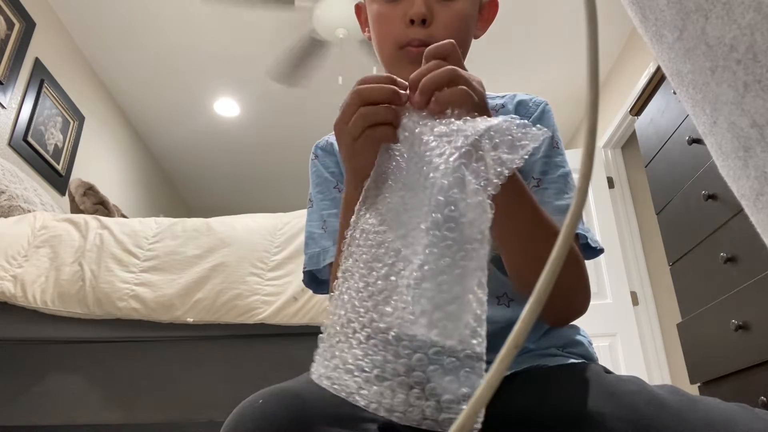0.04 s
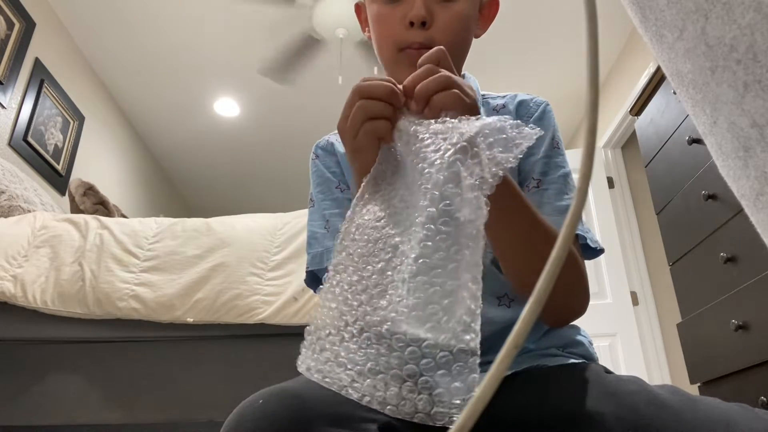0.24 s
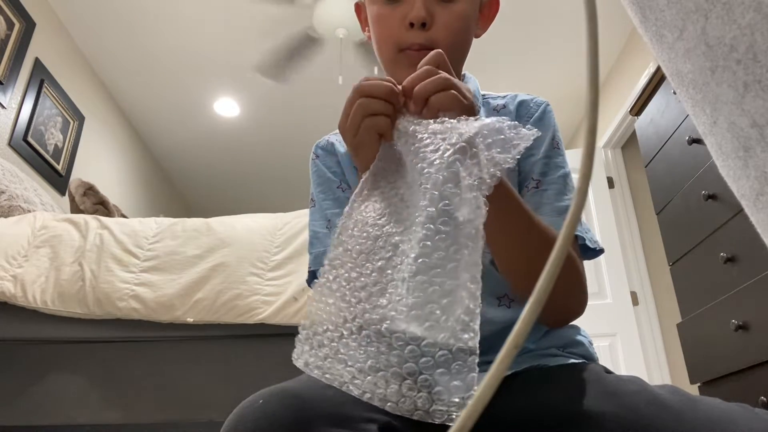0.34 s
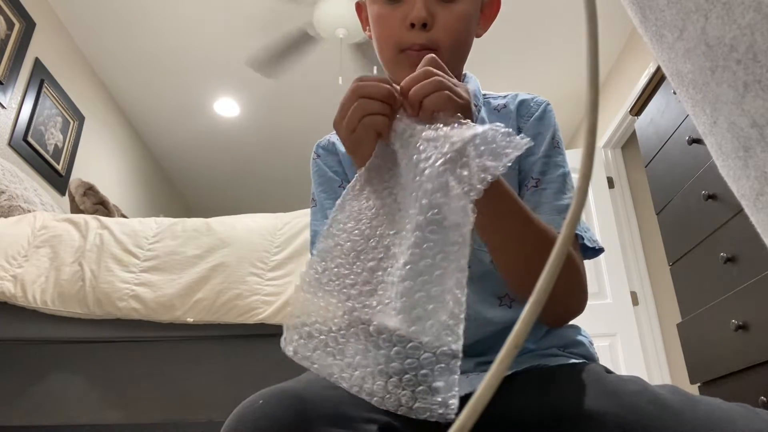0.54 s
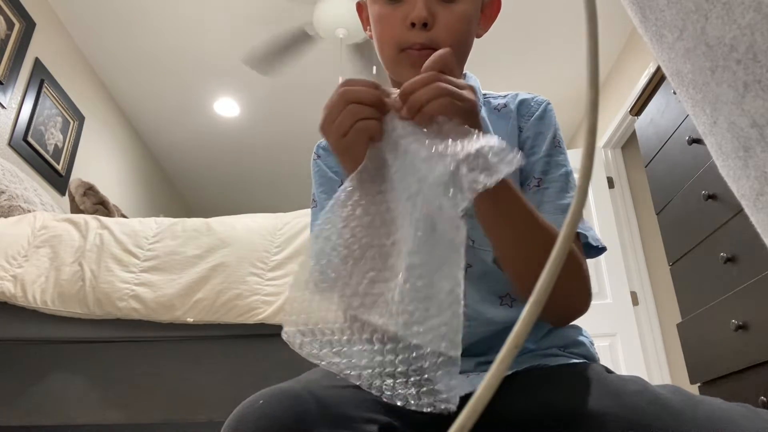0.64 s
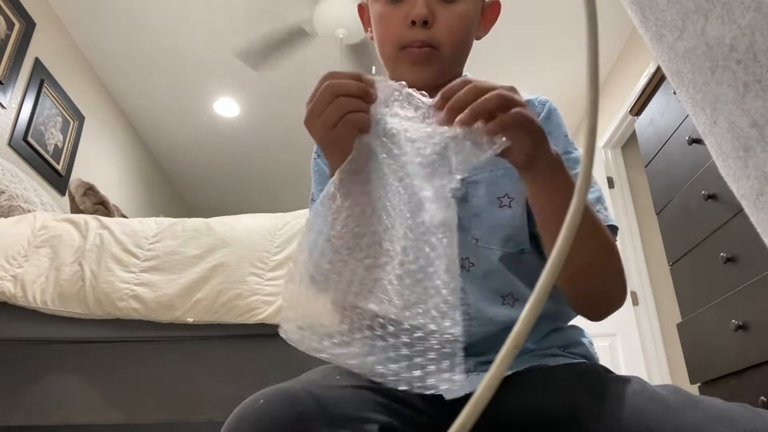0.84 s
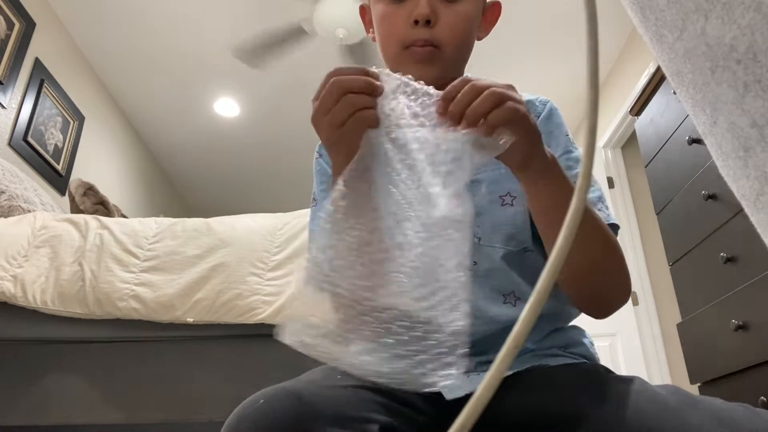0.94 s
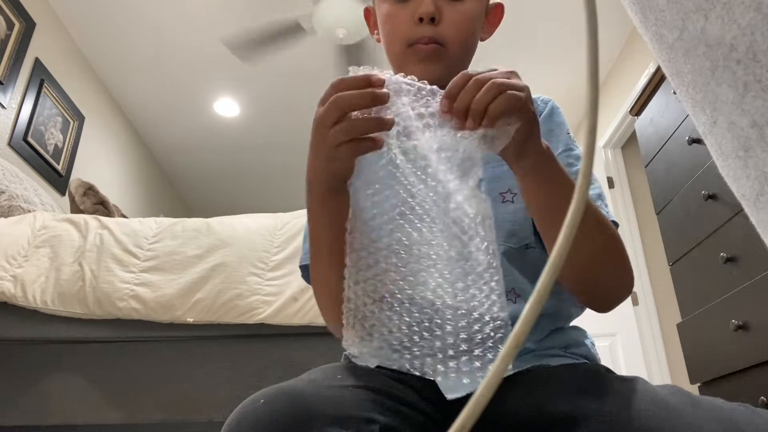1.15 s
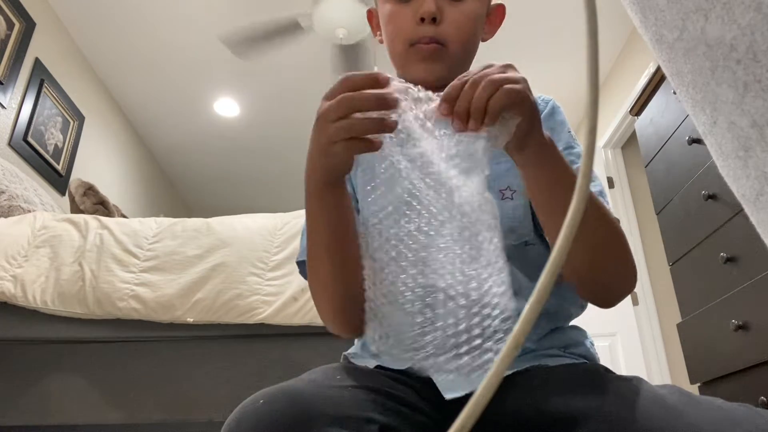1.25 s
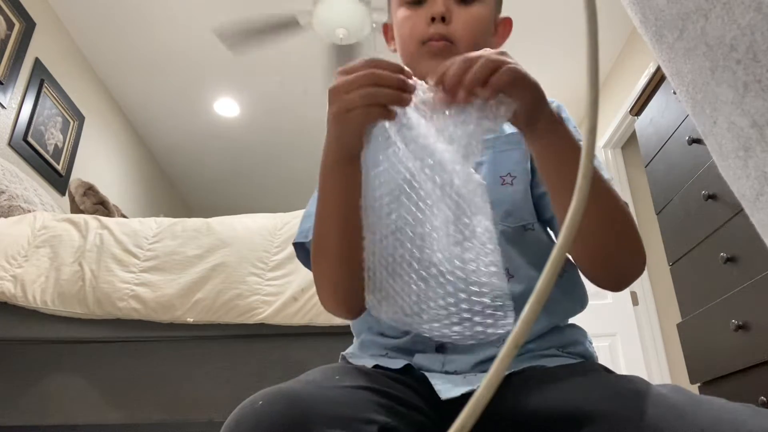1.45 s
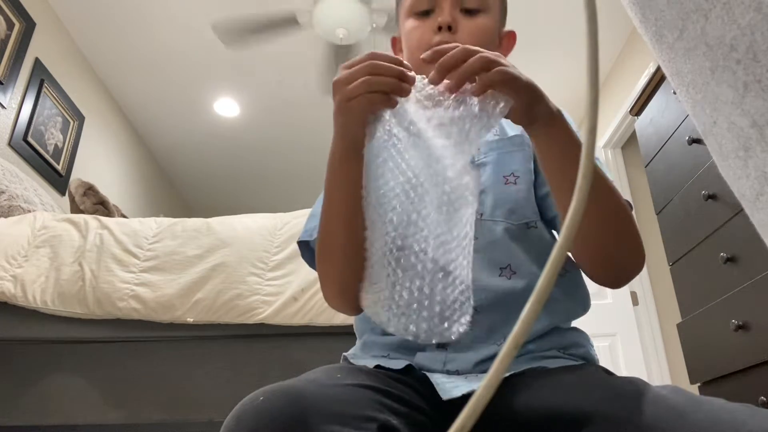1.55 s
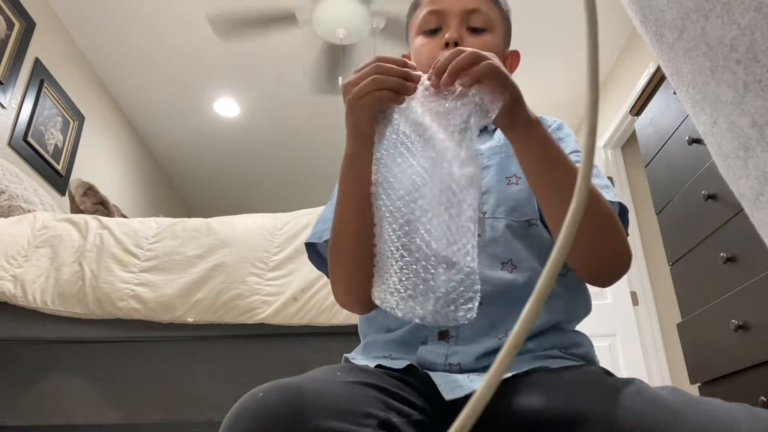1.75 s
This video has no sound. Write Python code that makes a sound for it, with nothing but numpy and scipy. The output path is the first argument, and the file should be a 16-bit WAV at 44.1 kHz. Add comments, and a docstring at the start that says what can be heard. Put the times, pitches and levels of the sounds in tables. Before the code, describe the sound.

Three sharp, close bubble wrap pops, followed by soft plastic crinkling in a quiet room.

```python
"""A small, quiet bedroom, with a sheet of bubble wrap held close to a stereo microphone pair.
Fingers burst three cells: each pop is a puff of air with a crack of tearing film, thrown back by the
ceiling and walls. Then the hands shift their grip: the film crinkles and ticks, and the hanging sheet
flaps softly. Underneath lie the low rumble of the moving body and the steady room tone."""
import sys
import numpy as np
from scipy import signal
from scipy.fft import rfft, irfft
from scipy.io import wavfile
from scipy.ndimage import uniform_filter1d

SR = 44100
rng = np.random.default_rng(int(sys.argv[2]) if len(sys.argv) > 2 else 0)


def inscribe(sig):
    """Save sig as 16-bit PCM at rate SR to the path in sys.argv[1].

    A 1-D sig is mono; a 2-D sig holds one channel per row.
    Samples are clipped to [-1, 1] before scaling.
    """
    pcm = np.round(np.clip(np.atleast_2d(sig).T, -1, 1) * 32767)
    wavfile.write(sys.argv[1], SR, pcm.astype(np.int16))


N = 79380

# cells bursting close to the microphones: (time [s], thump [dB], bass [dB], body [dB], ring [dB],
# treble [dB], crack [dB], crack tilt [dB/octave], recoil share [0-1], room send [dB])
BURSTING_CELLS = [(0.2323, -17, -16.5, -8.5, -7.5, -14.5, -1, 1.5, 0.62, -3.5),
                  (0.3322, 16, 3.5, -2.5, 0, -1.5, 8, -.5, 0, -10.5),
                  (0.5533, 0.5, -9.5, -3.5, 4.5, -24, -10.5, -3.5, 0.15, -13)]
# spectra of the close puff, the tearing film and the burst sent into the room: (frequency [Hz], level [dB])
PUFF_SPECTRUM = [(25, -53), (55, -5.5), (100, -0.5), (200, 12.5), (350, 19), (550, 20.5), (720, 24),
                 (950, 25), (1300, 7.5), (1650, 8), (2020, 19.5), (2380, 12), (2620, 6), (3300, 7),
                 (4500, 14), (6500, 12), (9500, -19), (12500, 6), (16000, -6)]
TEAR_SPECTRUM = [(300, -21.5), (1500, -2), (2800, -1.5), (5200, 7.5), (7500, 4.5), (9500, -5), (12500, -1),
                 (16000, -11)]
RADIATED_SPECTRUM = [(60, -9), (150, -9), (350, 16.5), (600, 12), (950, 15.5), (1300, 10), (1650, 13.5),
                     (2100, 13.5), (2600, 5), (3400, 12), (4600, 10.5), (7500, 13), (9500, 4), (12500, 6.5),
                     (16000, -24)]
def pops():
    """Each cell puffs, recoils, cracks and quivers; returns the direct sound and what reaches the room."""
    bands_hz = (70, 250, 900, 2200, 7000)  # thump, bass, body, ring, treble
    recoil_s, flutter_s, room_tone_share = 0.001614, 0.00274, 0.7
    direct, to_room = np.zeros((2, 2, N))
    for s, *bands_db, crack_db, tilt, recoil, room_db in BURSTING_CELLS:
        tone_db = read(list(zip(bands_hz, bands_db)), bins())
        puff = air_puff(read(PUFF_SPECTRUM, bins()) + tone_db)
        tear_db = crack_db + read(TEAR_SPECTRUM, bins()) + tilt_db(tilt)
        crack = colour(snap(decay_s=0.0016, rise_s=0.000074), tear_db)
        flutter_db = tear_db - 9.5 + tilt_db(-1.5)  # the torn film quivers on, softer and duller
        flutter = colour(snap(decay_s=flutter_s, rise_s=flutter_s), flutter_db)
        add(direct, s, puff + crack + flutter)
        add(direct, s + recoil_s, -recoil * puff)  # the cell wall springs back
        add(to_room, s, air_puff(read(RADIATED_SPECTRUM, bins()) + room_tone_share * tone_db + room_db))
    return direct, to_room


# single creases in the hands: (time [s], level [dB], tilt [dB/octave], decay [s])
CREASE_SNAPS = [(.056, -23, 2.5, 0.001), (0.086, -24.5, -2, 0.0012), (.183, -18.5, -1.5, 0.0043),
                (0.4745, -26, 12, 0.0006), (0.5369, -16, -2, 0.0023), (.6132, -17, 12, .0012),
                (0.6208, -7, 15, 0.0011), (0.6251, -5.5, 14.5, 0.0033), (0.6599, -7.5, 6.5, 0.004),
                (0.677, -7.5, -2, 0.0048), (0.682, -9, -2.5, 0.0019), (0.692, -11.5, -2, 0.0028),
                (.708, -17.5, -3.5, 0.00091), (0.756, -14, -2, 0.0016), (0.8215, -14.5, 6.5, 0.0012),
                (.847, -16, -4, .0012), (.9224, -8, 3, 0.0018), (0.9759, -14, -4, 0.0022),
                (.9985, -14, -3.5, .002), (1.0682, -10, 7.5, 0.001), (1.132, -21.5, -5.5, 0.0031),
                (1.148, -18.5, 12, 0.00074), (1.171, -16.5, 0, 0.00099), (1.2095, -11.5, 1, 0.0015),
                (1.223, -13, -1, 0.0021), (1.4134, -9, 1, 0.0032), (1.457, -15, -2, .003),
                (1.479, -20, 11, 0.0011), (1.582, -20.5, -2, 0.0027), (1.641, -19.5, 5, 0.0019)]
# bright, thin colour of the ticks and crinkling: (frequency [Hz], level [dB])
CRINKLE_COLOUR = [(300, -36), (1300, -10.5), (2100, 1), (2600, -8), (3300, -10), (4600, -5), (6000, -4.5),
                  (8100, -6), (9300, -20.5), (11500, -10.5), (13200, -15.5), (14400, -21.5), (16500, -47)]
def ticks():
    """Single creases snap over in the film."""
    out = np.zeros((2, N))
    for s, db, tilt, decay_s in CREASE_SNAPS:
        add(out, s, colour(snap(decay_s), db + read(CRINKLE_COLOUR, bins()) + tilt_db(tilt)))
    return out


# flaps of the hanging sheet: (time [s], level [dB], pitch [Hz])
SHEET_FLAPS = [(.182, -13.5, 680), (0.7565, -4, 780), (0.9223, 7.5, 708), (1.0123, 1, 627), (1.068, 0, 643),
               (1.173, -8, 593), (1.386, -4.5, 630), (1.4249, 3, 630), (1.459, -5.5, 370), (1.584, -8, 394),
               (1.692, -12.5, 690)]
# spectrum of one flap: (frequency [multiple of its pitch], level [dB])
FLAP_SPECTRUM = [(.08, -25), (.3, -6.5), (.7, -4), (1.3, 2), (1.9, -21), (3.2, -21), (6, -62)]
def buckles():
    """The sheet flips through and pushes a soft puff of air."""
    out = np.zeros((2, N))
    for s, db, hz in SHEET_FLAPS:
        add(out, s, air_puff(db + read(FLAP_SPECTRUM, bins() / hz)))
    return out


# crinkling of the film as the grip shifts: (time [s], level [dB])
CRINKLE_LEVEL = [(0, -71), (.07, -65.5), (.2, -62), (.45, -63), (.52, -55), (.6, -50.5), (.65, -52),
                 (.683, -40.5), (.71, -52.5), (.76, -60.5), (.817, -63), (.826, -51.5), (.89, -48.5),
                 (.94, -55), (1.01, -46.5), (1.06, -48.5), (1.09, -59), (1.125, -60.5), (1.14, -51),
                 (1.19, -58.5), (1.3, -49.5), (1.405, -54), (1.42, -45), (1.46, -50.5), (1.49, -59.5),
                 (1.655, -61.5), (1.683, -50.5), (1.703, -49), (1.725, -65), (1.765, -51.5), (1.8, -62)]
def crinkle():
    """Countless small creases and a few larger ones give way in the film."""
    creases = unit(grains(per_s=5000, spread_db=4.5)) + amp(-7.5) * crackles()
    return shaped(creases, CRINKLE_COLOUR) * level(CRINKLE_LEVEL)


def crackles(pitches=10, low_hz=1820, high_hz=12170, decay_cycles=2.6):
    """Larger creases, each ringing for a few cycles at its own pitch."""
    out, t = np.zeros((2, N)), np.arange(512) / SR
    clicks = grains(per_s=250, spread_db=2.5)
    pitch_index = rng.integers(pitches, size=N // 128 + 1).repeat(128)[:N]
    for k, hz in enumerate(np.geomspace(low_hz, high_hz, pitches)):
        ring = unit(np.exp(-t * hz / decay_cycles) * np.sin(2 * np.pi * hz * t)) * np.sqrt(hz)
        out += signal.oaconvolve(clicks * (pitch_index == k), ring[None], axes=1)[:, :N]
    return unit(out)


# spectrum of the whole sheet: (frequency [Hz], level [dB])
SHEET_SPECTRUM = [(60, -6), (200, -3), (380, 4.5), (600, 2.5), (950, 3.5), (1300, -11.5), (2200, -9.5),
                  (4000, -24), (16000, -25)]
# rustling of the sheet: (time [s], level [dB])
RUSTLE_LEVEL = [(0, -68.5), (.5, -58), (.64, -52.5), (.69, -43), (.73, -54.5), (.81, -54.5), (.875, -48),
                (.9, -43.5), (.95, -48), (1.02, -42), (1.1, -57), (1.17, -53), (1.39, -51.5),
                (1.425, -43.5), (1.48, -51), (1.54, -63), (1.585, -55.5), (1.64, -77), (1.695, -52),
                (1.73, -72), (1.77, -52), (1.8, -68)]
def rustle():
    """The moving sheet rustles, duller than its creases."""
    return shaped(grains(per_s=1500, spread_db=3), SHEET_SPECTRUM) * level(RUSTLE_LEVEL)


# spectrum of the hand on the sheet: (frequency [Hz], level [dB])
RUB_SPECTRUM = [(200, -24.5), (450, -13.5), (600, -0.5), (820, -3.5), (980, -5), (1250, -21), (4000, -42)]
# slide of the hand: (time [s], level [dB])
RUB_LEVEL = [(.66, -63), (.7, -43.5), (.73, -52.5), (.755, -40.5), (.79, -50), (.815, -56.5)]
def rub():
    """A hand slides over the sheet with a hollow rub."""
    return shaped(grains(per_s=1500, spread_db=3), RUB_SPECTRUM) * level(RUB_LEVEL)


# nearest walls and ceiling: (delay [s], level [dB], dull above [Hz])
WALL_ECHOES = [(0.0114, -13, 13900), (0.0151, -5, 5000), (.0175, -8, 5500)]
# reverberation of the bedroom: (frequency [Hz], time to fall 60 dB [s])
BEDROOM_DECAY = [(150, 0.092), (600, 0.24), (2000, 0.26), (6000, 0.24), (13000, 0.23)]
def bedroom(x, gap_s=0.0012, build_s=0.012):
    """Walls and ceiling return a few early echoes and a short diffuse tail."""
    hz, t, spectra = signal.stft(noise(SR // 2), SR, nperseg=256)
    decay = amp(-60 * t / read(BEDROOM_DECAY, hz)[:, None])
    tail = signal.istft(spectra * decay, SR, nperseg=256)[1]
    tail *= np.clip((np.arange(tail.shape[1]) / SR - gap_s) / build_s, 0, 1)
    tail /= np.linalg.norm(tail, axis=1, keepdims=True)
    for delay_s, db, dull_hz in WALL_ECHOES:
        treble_loss_db = 10 * np.log10(1 + (bins() / dull_hz) ** 4)
        add(tail, delay_s, colour(snap(decay_s=0.0005), db - treble_loss_db))
    return signal.fftconvolve(x, tail, axes=1)[:, :N]


# spectrum of the moving body: (frequency [Hz], level [dB])
RUMBLE_SPECTRUM = [(20, -23), (40, -8), (65, 0.5), (140, -1.5), (250, -8.5), (600, -35), (2000, -82)]
# its rumble and a brief low hum, before panning: (time [s], level [dB])
RUMBLE_LEVEL = [(0, -60), (.5, -63.5), (.95, -58), (1.08, -56.5), (1.2, -58), (1.45, -58), (1.53, -62),
                (1.8, -60)]
HUM_LEVEL = [(1.24, -80), (1.29, -59.5), (1.44, -55), (1.5, -73.5)]
def body_rumble(hum_hz=90.5, wobble_depth=0.022, left_over_right_db=16.5):
    """The moving body rumbles and a wavering hum swells briefly, both stronger on the left microphone."""
    rumble = shaped(noise(N), RUMBLE_SPECTRUM) * level(RUMBLE_LEVEL)
    wobble = unit(uniform_filter1d(rng.standard_normal(N), size=1500))
    pitch_hz = hum_hz * (1 + wobble_depth * wobble)
    hum = np.sqrt(2) * np.sin(2 * np.pi * np.cumsum(pitch_hz) / SR) * level(HUM_LEVEL)
    return (rumble + hum) * amp([[left_over_right_db / 2], [-left_over_right_db / 2]])


# background of the bedroom: (frequency [Hz], level [dB])
ROOM_TONE_SPECTRUM = [(25, -36), (60, 0), (150, 5.5), (400, 13.5), (900, -10.5), (1300, -6), (2100, -15.5),
                      (3500, -8), (7500, -37), (9500, -61), (12500, -50), (16000, -28)]
def room_tone():
    """Faint, steady noise of the quiet room."""
    return amp(-61.5) * shaped(noise(N), ROOM_TONE_SPECTRUM)


# likeness of the sound at the two microphones: (frequency [Hz], correlation [-1 to 1])
MIC_CORRELATION = [(60, -0.62), (250, 0.49), (600, 0.43), (2000, 0.44), (4500, 0.079), (8000, 0.61),
                   (12000, 0.98)]
def pair(unrelated):
    """Two unrelated signals become the partly alike left and right channels."""
    size = unrelated.shape[1]
    a, b = rfft(unrelated)
    likeness = np.clip(read(MIC_CORRELATION, bins(size)), -1, 1)
    mid, side = a * np.sqrt((1 + likeness) / 2), b * np.sqrt((1 - likeness) / 2)
    return irfft(np.array([mid + side, mid - side]), size)


def noise(size):
    """White noise at the microphone pair."""
    return pair(rng.standard_normal((2, size)))


def grains(per_s, spread_db):
    """Random clicks, many small and a few large."""
    strength = amp(spread_db * np.minimum(rng.exponential(1, (2, N)), 5))
    polarity = rng.choice([-1, 1], (2, N))
    fires = rng.random((2, N)) < per_s / SR
    return pair(strength * polarity * fires)


def snap(decay_s, rise_s=0.00005, size=2048):
    """A dying spray of clicks with an even spectrum, energy 1 per channel."""
    t = np.arange(size) / SR
    spray = noise(size) * np.exp(-t / decay_s) * (1 - np.exp(-t / rise_s))
    fade = np.exp(-(t / (4 * decay_s)) ** 2)
    for _ in range(4):  # flatten the spectrum while keeping the snap short
        spectrum = rfft(spray)
        spray = irfft(spectrum / (abs(spectrum) + 1e-9)) * fade
    return spray / np.linalg.norm(spray, axis=1, keepdims=True)


def air_puff(db):
    """A pressure pulse whose low notes arrive later."""
    return pulse(db, lag_cycles=0.813)


def pulse(db, lag_cycles=0):
    """Causal click with the given spectrum; each frequency may be late by some of its own cycles."""
    cepstrum = irfft(np.log(amp(db)))
    half = len(cepstrum) // 2
    cepstrum[1:half] *= 2  # fold to minimum phase
    cepstrum[half + 1:] = 0
    phase_lag = 2 * np.pi * lag_cycles * np.log(bins() / SR * 2 + 1e-4)
    return irfft(np.exp(rfft(cepstrum) - 1j * phase_lag))[:half]


def colour(x, db):
    """Filters by a causal spectrum."""
    return signal.fftconvolve(np.atleast_2d(x), pulse(db)[None], axes=1)[:, :x.shape[-1]]


def shaped(x, spectrum):
    """Filters by a spectrum table and scales to rms 1."""
    return unit(colour(x, read(spectrum, bins())))


def tilt_db(db_per_octave, pivot_hz=7000, flat_below_hz=1000):
    """A slope that turns a click brighter or duller."""
    return db_per_octave * np.log2(np.maximum(bins(), flat_below_hz) / pivot_hz)


def amp(db):
    """Decibels to gain."""
    return 10 ** (np.asarray(db) / 20)


def unit(x):
    """Scales to rms 1."""
    return x / np.sqrt(np.mean(x ** 2) + 1e-20)


def bins(size=4096):
    """Frequencies of a spectrum in Hz."""
    return np.fft.rfftfreq(size, 1 / SR)


def read(points, hz):
    """Reads a table on a log-frequency axis."""
    table_hz, value = np.transpose(points)
    return np.interp(np.log(hz + 1e-3), np.log(table_hz), value)


def level(points):
    """Gain over time from a level table."""
    times, db = np.transpose(points)
    return amp(np.interp(np.arange(N) / SR, times, db))


def add(mix, s, sound):
    """Mixes a sound in at time s."""
    part = mix[..., round(s * SR):][..., :sound.shape[-1]]
    part += sound[..., :part.shape[-1]]


def scene():
    """Close pops and handling, with the bedroom behind them."""
    direct, to_room = pops()
    handling = ticks() + buckles() + crinkle() + rustle() + rub()
    reflections = bedroom(to_room + amp(-17.5) * handling)
    return direct + handling + reflections + body_rumble() + room_tone()


# left microphone over the right: (frequency [Hz], level [dB])
MIC_BALANCE = [(100, -3), (350, 3.5), (700, 3.5), (950, 4), (1650, 7), (2000, 3), (2400, 15), (2800, 13.5),
               (3400, -1), (4500, 10), (6000, -4.5), (7700, 2), (10000, -0.5)]
# left channel relative to the right, negative when the left is later: (frequency [Hz], phase [rad])
MIC_PHASE_DIFFERENCE = [(0, 0), (1030, 0), (1980, -6), (3960, -8.5), (4910, -11.5), (6120, -11.5),
                        (10200, -9), (11100, -6), (14000, -4.5), (16600, -3)]
def record(dry):
    """The two microphones differ in level and phase; peaks are rounded off and the top treble is cut."""
    ceiling, cutoff_hz = 0.85, 16900
    hz = bins(1024)
    left_gain = amp(read(MIC_BALANCE, hz) / 2) * np.exp(0.5j * read(MIC_PHASE_DIFFERENCE, hz))
    mic_responses = np.fft.fftshift(irfft(np.array([left_gain, 1 / left_gain])), axes=1)
    heard = signal.fftconvolve(dry, mic_responses, "same", axes=1)
    rounded = heard / (1 + (heard / ceiling) ** 8) ** (1 / 8)
    lowpass = signal.firwin(511, cutoff_hz, window=("kaiser", 9), fs=SR)
    return signal.oaconvolve(rounded, lowpass[None], "same")


dry = scene()
out = record(dry)
inscribe(out)
```